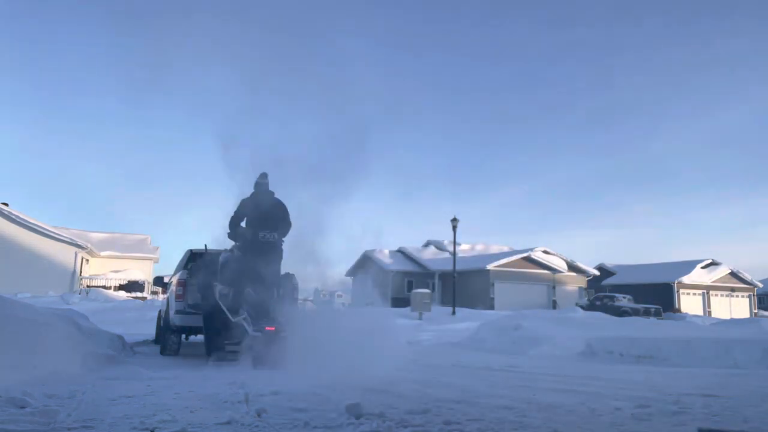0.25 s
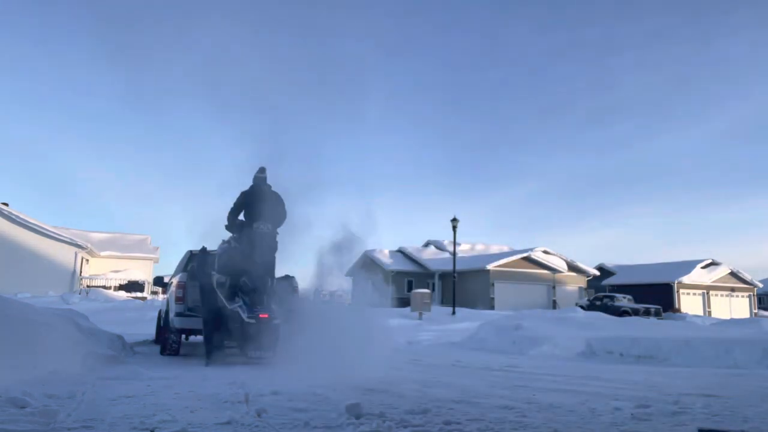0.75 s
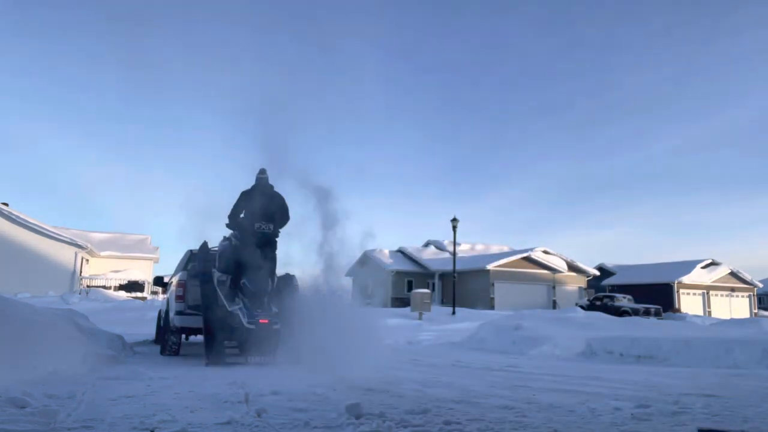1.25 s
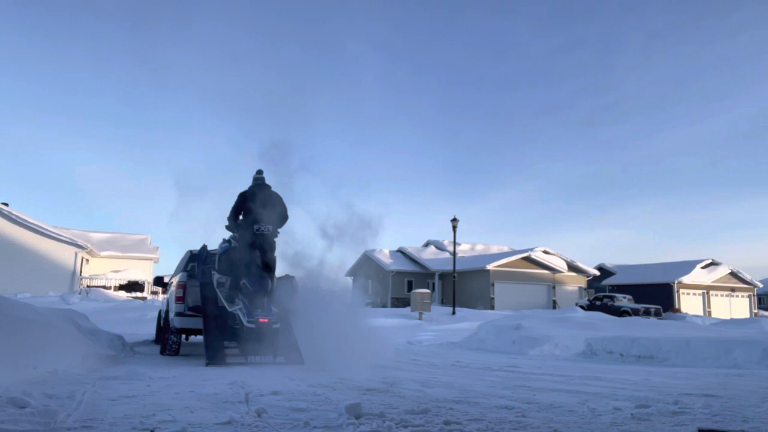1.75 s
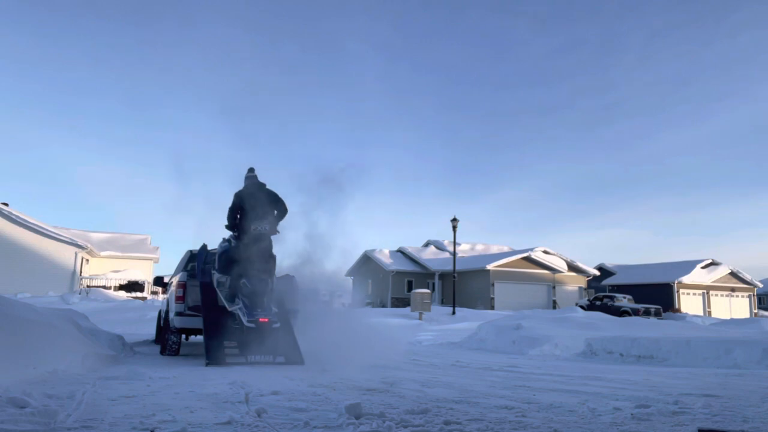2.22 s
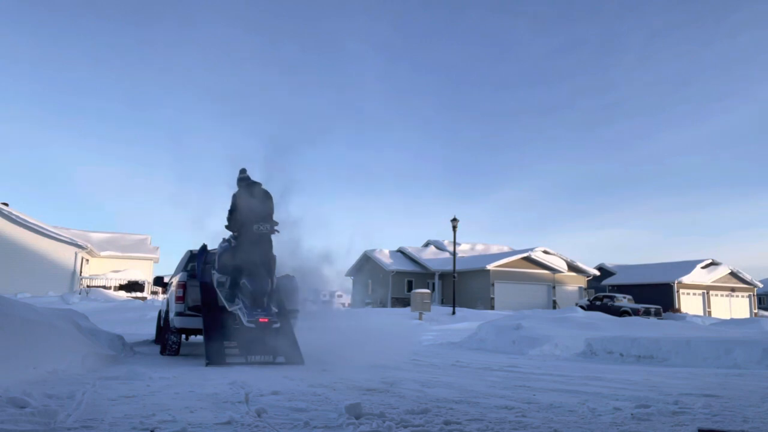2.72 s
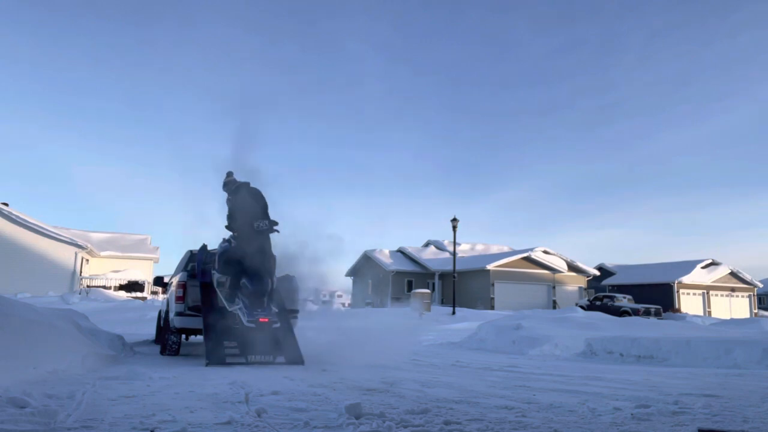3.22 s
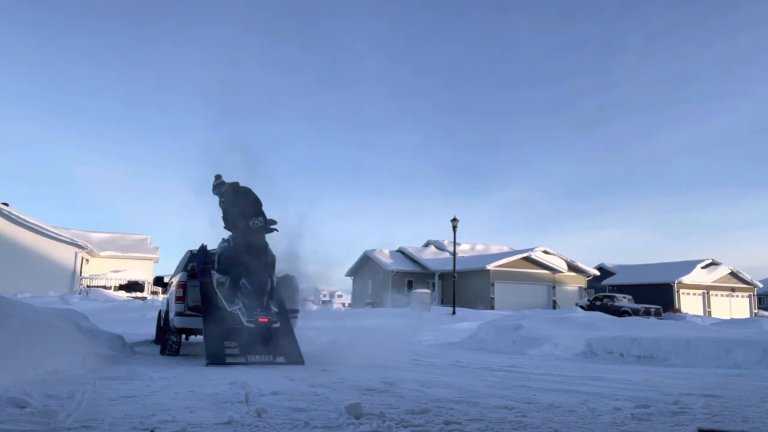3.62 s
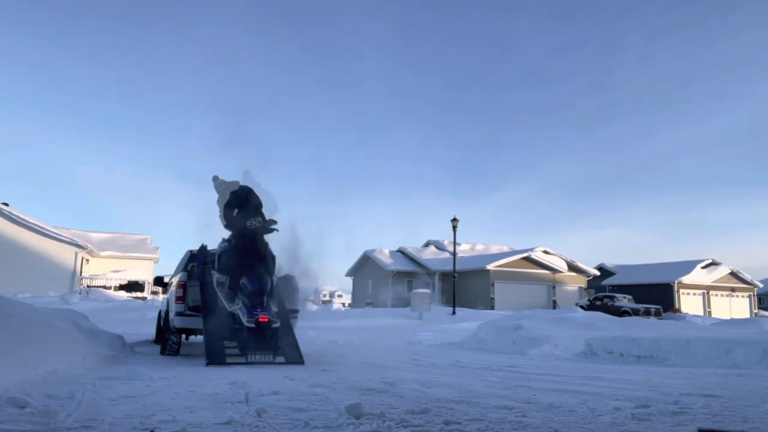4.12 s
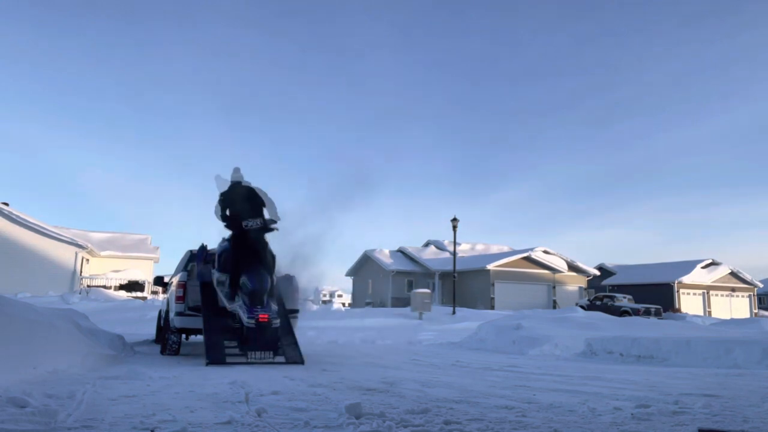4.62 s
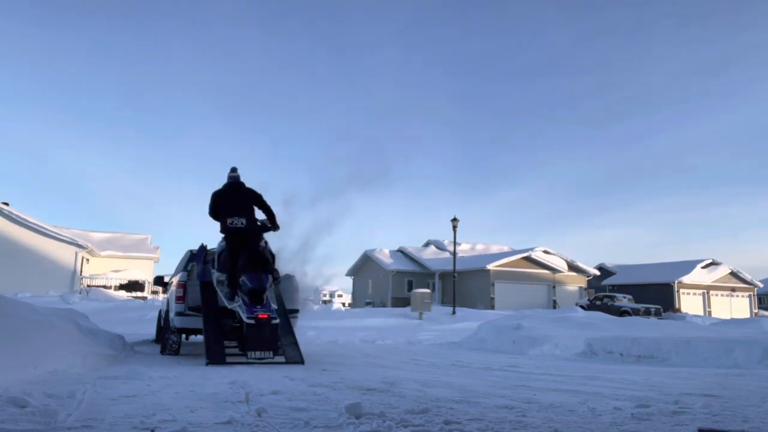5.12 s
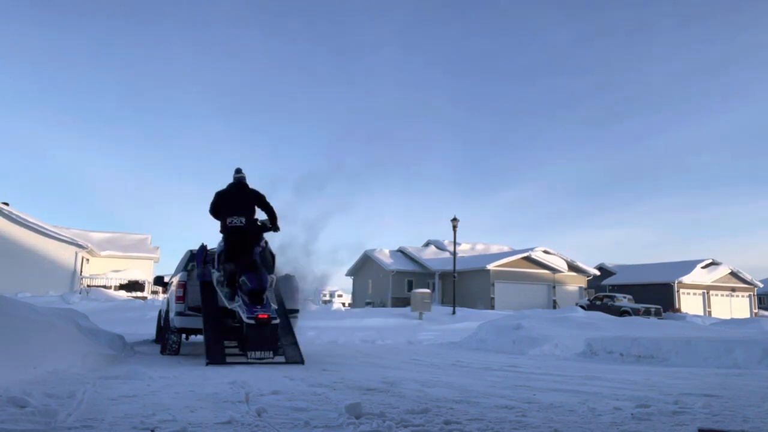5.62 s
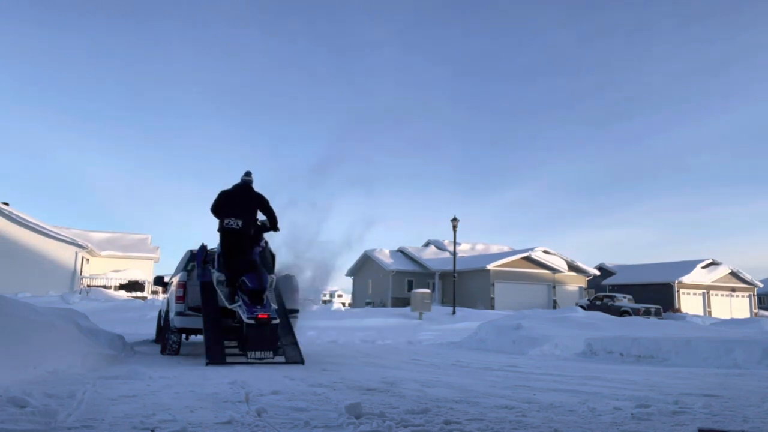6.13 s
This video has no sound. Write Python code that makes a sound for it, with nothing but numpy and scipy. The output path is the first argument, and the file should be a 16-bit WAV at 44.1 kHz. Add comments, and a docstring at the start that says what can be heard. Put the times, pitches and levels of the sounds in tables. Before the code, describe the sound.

Stereo phone capture of a snowmobile engine some metres away outdoors. It begins revved up in a buzzing drone, falls quickly to a slow chugging idle with hissing ticks and brief missed beats, then picks up to a fluttering, unsteady boom. Near the end it swells into a rough, full, rattling pull, with frequent metallic clacks and dull thuds over low chassis rumble.

```python
"""Two-stroke snowmobile, blip to idle to pull

A twin snowmobile on a ramp behind a pickup on a snowy street, heard some metres away. A throttle blip falls
to a lumpy idle, then the engine pulls with misfires. Its exhaust note sums crank orders through four pipe
bands. Coloured noise makes the rumble, the rush of air, the case rattle and the gas hiss, which ticks
strongly then weakly within each turn. Ringing noise bursts make the knocks of a metal part.
"""
import sys
import numpy as np
from scipy import signal
from scipy.fft import rfft, irfft, next_fast_len
from scipy.io import wavfile
from scipy.ndimage import uniform_filter1d

SR = 44100
rng = np.random.default_rng(int(sys.argv[2]) if len(sys.argv) > 2 else 0)


def store_pcm(level_fs):
    """Save levels as 16-bit WAV."""
    pcm = np.round(np.clip(level_fs, -1, 1) * 32767).astype(np.int16)
    wavfile.write(sys.argv[1], SR, np.atleast_2d(pcm).T)


N = 280476

# Noise colours, scaled to rms 1 before use: chassis rumble, rush of air, case rattle, steady gas hiss,
# ticking gas. Each row: frequency in Hz, relative density in dB per Hz.
RUMBLE_COLOUR = [(15, -41.5), (30, -24), (55, -4), (130, -7.5), (300, -12.5), (600, -44), (1200, -75)]
RUSH_COLOUR = [(300, -13), (700, 10), (1500, -6.5), (3500, -3.5), (6000, -5), (8500, -2.5), (11000, -10.5),
               (16000, -17.5)]
RATTLE_COLOUR = [(250, -14), (450, -3), (620, -1), (760, -5), (980, 0), (1280, -8), (1490, 3), (1750, -8),
                 (2080, 1), (2210, -5), (2340, -1), (2700, -10), (4000, -20)]
HISS_COLOUR = [(1500, -8), (3000, 22), (4500, 7.5), (4670, 17), (4850, -1), (6500, -5.5), (9000, -13),
               (12000, -16.5), (14000, -12), (16000, -15.5)]
TICK_COLOUR = [(1500, -17.5), (3000, 11), (4700, 0.5), (7000, 1), (9000, -6), (12000, 0), (14000, -12),
               (16000, -4.5)]
# Rush of air as the throttle shuts. Each row: time in seconds, level in dB.
RUSH_LEVEL = [(0.0, -43), (0.23, -43.5), (0.265, -32), (0.344, -26), (0.564, -50), (0.75, -68), (.95, -96)]

# Knocks of metal. Each row: start in seconds, crack level in dB, thud level in dB, both before the decay.
KNOCKS = [(0.047, -44, -60), (0.157, -44, -60), (0.7907, -65, -35.5), (1.012, -50, -54), (1.0407, -50, -47),
          (1.2351, -45, -55), (1.4627, -48, -50), (2.155, -42, -50), (2.308, -44, -65),
          (2.4401, -26.5, -44), (2.48, -35, -45), (2.698, -46.5, -61), (2.8886, -49, -67),
          (3.9449, -50, -46), (4.169, -49, -52.5), (4.4334, -48, -56.5), (4.8482, -42.5, -38),
          (5.034, -49, -48), (5.1178, -41, -47), (5.148, -44, -48), (5.2848, -40, -42), (5.3942, -36, -36),
          (5.449, -39.5, -43), (5.609, -43, -51.5), (5.6919, -41, -44.5), (5.962, -35.5, -41),
          (6.1567, -38.5, -43), (6.1844, -35.5, -36)]
# Ringing of the knocked part. Each row: frequency in Hz, width in Hz, relative level in dB.
KNOCK_MODES = [(4330, 990, 3), (7450, 2500, -3.5), (11000, 2400, -1), (2300, 1200, -1.5)]

# Speed of the crank. Each row: time in seconds, turns per second in Hz.
CRANK = [(0.0, 55.92), (0.28, 57.47), (0.43, 54.45), (0.49, 47.5), (0.6, 37.25), (0.8, 26.53),
         (0.99, 24.18), (1.26, 25.21), (1.38, 26.86), (1.7, 24.16), (2.0, 24.18), (2.1, 23.56),
         (2.21, 25.52), (2.48, 29.88), (2.81, 37.78), (2.92, 36.87), (3.2, 39.91), (3.35, 38.96),
         (3.65, 41.28), (3.9, 40.78), (4.16, 38.96), (4.29, 35.67), (4.68, 39.06), (5.14, 36.66),
         (5.37, 35.19), (5.48, 38.06), (5.66, 36.26), (6.0, 37.26), (6.12, 35.3), (6.24, 38.43),
         (6.36, 39.4)]
# How hard the engine works. Each row: time in seconds, effort in dB over the idle,
# odd crank orders in dB against the even ones.
EFFORT = [(0, 14, -21), (.23, 14, -21.5), (.35, 17.5, -19), (.55, 11, -11), (.92, -2.5, -1),
          (1.6, -2.5, -4.5), (2.3, 0, -8.5), (2.7, 1, -2.5), (3.3, 1, -2.5), (4.1, 1.5, -1), (4.6, 5.5, -3),
          (5.05, 11.5, -4), (5.2, 10.5, -8), (6.36, 11.5, 0.5)]
# Exhaust pipe bands, low to high. Each row: frequency in Hz, relative gain in dB.
THUMP_BAND = [(38, -40), (48, -6), (75, -4), (105, 1.5), (125, -5.5), (140, -34)]
BOOM_BAND = [(120, -30.5), (135, -3), (152, 6.5), (175, 4), (198, -8), (212, -37)]
DRONE_BAND = [(188, -25.5), (205, -1.5), (225, 3.5), (242, -5), (265, -18.5), (300, -13.5), (330, -22),
              (350, -31.5)]
SNARL_BAND = [(320, -33), (345, -8.5), (385, -1), (410, 8.5), (435, 0), (460, -8), (500, -8.5), (570, -8.5),
              (640, -15.5), (900, -25.5), (1030, -12), (1130, -28), (1250, -20.5)]
# Base levels of three pipe bands. Each row: time in seconds, thump in dB, boom in dB, drone in dB.
PIPE_LEVELS = [(0.0, -35.5, -35, -13.5), (0.22, -39, -31.5, -13), (0.41, -30.5, -52.5, -9),
               (0.45, -15.5, -26.5, -10.5), (0.49, -19.5, -16, -28.5), (0.55, -25.5, -17, -25.5),
               (0.61, -20, -45.5, -24.5), (0.72, -31, -27.5, -24), (0.83, -28.5, -20, -33.5),
               (0.95, -32, -24, -42), (1.19, -27.5, -20.5, -39), (1.45, -29, -23.5, -31),
               (1.85, -23.5, -20.5, -38), (2.4, -26, -20, -33.5), (2.8, -26, -14.5, -22),
               (3.1, -25.5, -14, -26), (3.55, -23, -13.5, -24), (3.75, -24, -20.5, -24),
               (4.02, -23.5, -16.5, -23.5), (4.16, -25, -14, -25), (4.4, -26.5, -17.5, -21.5),
               (4.6, -24.5, -12.5, -20.5), (5.05, -21.5, -10, -14), (5.15, -15.5, -12.5, -13),
               (5.5, -19.5, -9, -16), (5.67, -17, -11.5, -14), (6.36, -20, -9.5, -17)]
# Momentary sags of the boom. Each row: centre in seconds, change in dB, bell spread (sigma) in seconds.
BOOM_SAGS = [(2.621, -4, .03), (2.94, -5, 0.022), (3.232, -5.5, .05), (3.458, -21, 0.021),
             (3.588, -15.5, 0.033), (3.879, -8.5, 0.023), (4.001, -7.5, 0.055), (4.231, -11.5, 0.023),
             (4.45, -16, 0.015)]
# Stumble of the blip. The one row: centre in seconds, bell spread (sigma) in seconds.
STUMBLE = (.28, 0.022)
# Missed burns. Each row: centre in seconds, change in dB.
MISFIRES = [(0.921, -9), (1.263, -11), (1.758, -10), (1.88, -16.5), (2.047, -16), (2.456, -8),
            (4.221, -13.5), (5.144, -7), (5.172, -6), (5.256, -7), (5.284, -7.5), (5.369, -6.5),
            (5.418, -4), (5.689, -8), (5.722, -2), (5.826, -6), (6.094, -4.5), (6.186, -6.5)]

# Stereo lead. Each row: frequency in Hz, phase in radians by which left leads.
STEREO_PHASE = [(0, 0), (520, 0.5), (1380, 0.6), (2150, 1.9), (6890, 8.2), (7670, 6.6), (8870, 6.1),
                (9730, 3.3), (10600, 3.0), (11800, 0.1), (13000, -0.3), (13700, -3.2), (14600, -3.2),
                (15500, -6.5)]
# Stereo balance. Each row: frequency in Hz, left minus right in dB.
STEREO_BALANCE = [(60, 3), (110, -5.5), (200, -3.5), (380, -2.5), (700, 0.5), (1290, 0), (2380, -2),
                  (4400, -1), (8120, 0), (15000, -0.5)]
# Scattered sound. Each row: frequency in Hz, gain in dB.
SCATTER_GAIN = [(60, -30), (150, -27.5), (400, -8.5), (1000, 0.5), (3000, -10), (5500, -0.5), (8000, -9.5),
                (16000, -26.5)]

IDLE_HZ = 25  # reference crank speed
RUMBLE_DB = -19  # against the running level of the exhaust note
RATTLE_DB = -54.5  # at zero effort, before its throb and wander
HISS_DB, HISS_DB_PER_EFFORT_DB = -56.5, 0.74  # steady and ticking gas together, at zero effort
IDLE_TICK, TICK_POWER = 0.75, 2.4  # ticking share of gas power at IDLE_HZ, and how fast speed reduces it
SNARL_DB, SNARL_DB_PER_EFFORT_DB, SNARL_DB_PER_OCTAVE = -54.5, 0.75, 13  # at zero effort and IDLE_HZ
STUMBLE_DRONE_DB, STUMBLE_SNARL_DB = -10.5, 4.5
IDLE_ROUGH, ROUGH_HALVES_DB = 0.24, 7  # uneven burn at IDLE_HZ, halved by each 7 dB of effort
COAST_HZ_PER_S = 400  # a fall of crank speed that adds 1 to the roughness
STROKE_SCATTER_DB = 2  # stroke-to-stroke spread, times the root of the roughness


def undb(db):
    """Turn decibels into gain."""
    return 10 ** (np.asarray(db) / 20)


def unit(x):
    """Scale to rms 1."""
    return x / np.sqrt(np.mean(x ** 2))


def steady(x, span_s):
    """Level a sound by its running rms, bringing it to about 1."""
    size = int(span_s * SR)
    power = uniform_filter1d(uniform_filter1d(x ** 2, size), size)
    return x / np.sqrt(power + 1e-18)


def curves(table):
    """Draw the columns of a timed table as sample-by-sample automation."""
    s, *columns = np.transpose(table)
    return [np.interp(np.arange(N) / SR, s, column) for column in columns]


def bell(centre_s, spread_s):
    """Shape a smooth Gaussian bump of height 1."""
    return np.exp(-0.5 * ((np.arange(N) / SR - centre_s) / spread_s) ** 2)


def wander(rate):
    """Drift between complex random values, rate times a second, rms about 1."""
    knots = rng.standard_normal((2, int(N / SR * rate) + 2))
    place = np.arange(N) / SR * rate
    real, imag = [np.interp(place, np.arange(knots.shape[1]), row) for row in knots]
    return (real + 1j * imag) * np.sqrt(3 / 4)  # brings the mean power to 1


def on_log(table, size=N):
    """Read a frequency table at every spectrum bin, along a log axis."""
    hz, value = np.transpose(table)
    return np.interp(np.log(np.fft.rfftfreq(size, 1 / SR) + 1), np.log(hz + 1), value)


def noise_pair(colour):
    """Colour two independent noises in the spectrum, each rms 1: for direct and scattered sound."""
    gain = undb(on_log(colour))
    return np.array([unit(irfft(rfft(rng.standard_normal(N)) * gain, N)) for _ in range(2)])


def ring(x, modes):
    """Excite resonances side by side, alternating in sign."""
    out = 0
    for k, (hz, width_hz, db) in enumerate(modes):
        b, a = signal.iirpeak(hz, hz / width_hz, fs=SR)
        out = out + (-1) ** k * undb(db) * signal.lfilter(b, a, x)
    return out


def chassis_rumble(note):
    """Low noise of the chassis that swells with the exhaust note's power."""
    note_level = np.sqrt(uniform_filter1d(note ** 2, int(0.15 * SR)))
    return undb(RUMBLE_DB) * note_level * noise_pair(RUMBLE_COLOUR)


def air_rush():
    """Turbulent air as the throttle shuts: a swell of broad noise."""
    return undb(curves(RUSH_LEVEL)[0]) * noise_pair(RUSH_COLOUR)


def knocks(crack_s=0.0039, tail_s=0.054, tail_db=-13, thud_s=0.033, rise_s=0.00092, swell_s=0.01):
    """Metal on metal: a bright ringing crack with a short tail over a dull thud."""
    t = np.arange(int(0.2 * SR)) / SR
    crack_shape = np.exp(-t / crack_s) + undb(tail_db) * np.exp(-t / tail_s)
    crack_shape = crack_shape * (1 - np.exp(-t / rise_s))
    thud_shape = np.exp(-t / thud_s) * (1 - np.exp(-t / swell_s))
    thud_mode = [(600, 600, 0)]  # Hz, width in Hz, dB
    out = np.zeros(N + len(t))
    for s, crack_db, thud_db in KNOCKS:
        burst = rng.standard_normal((2, len(t)))
        crack = unit(ring(burst[0], KNOCK_MODES)) * crack_shape
        thud = unit(ring(ring(burst[1], thud_mode), thud_mode)) * thud_shape
        start = int(s * SR)
        out[start:start + len(t)] += undb(crack_db) * crack + undb(thud_db) * thud
    return out[:N]


def gas_puffs(turns, hz, lag=0.064, decay_s=0.011, second_db=-9):
    """Envelope of a decaying gas puff at each half turn, every second one weaker; lag in turns."""
    half_turns = 2 * (turns + lag)
    k = half_turns.astype(int)
    scatter_db = 1.5 * rng.standard_normal(k[-1] + 1)[k]
    age_s = (half_turns - k) / (2 * hz)
    puff = undb(second_db * (k % 2) + scatter_db) * np.exp(-age_s / decay_s)
    return steady(uniform_filter1d(puff, int(0.0024 * SR)), 0.16)


def gas_hiss(effort_db, tick_share, puff):
    """Escaping gas: power shared between steady hiss and noise pulsed by the puffs."""
    gas = undb(HISS_DB + HISS_DB_PER_EFFORT_DB * effort_db)
    hiss = gas * np.sqrt(1 - tick_share) * noise_pair(HISS_COLOUR)
    tick = gas * np.sqrt(tick_share) * puff * noise_pair(TICK_COLOUR)
    return hiss + tick


def case_rattle(effort_db, tick_share, puff):
    """Rattling case: noise that follows the effort, throbs with the puffs and wanders in level."""
    # the case rings longer, so its rattle throbs less
    throb = 1 + 0.51 * tick_share * uniform_filter1d(puff, int(0.004 * SR))
    level = undb(RATTLE_DB + effort_db) * throb * undb(2.0 * wander(30).real)
    return level * noise_pair(RATTLE_COLOUR)


def roughness(hz, effort_db):
    """Unevenness of the burn: eased by effort and crank speed, raised as the engine slows."""
    rough = IDLE_ROUGH * 0.5 ** (effort_db / ROUGH_HALVES_DB) * IDLE_HZ / hz
    slowing = uniform_filter1d(-np.gradient(hz) * SR, SR // 20)
    return rough + np.clip(slowing / COAST_HZ_PER_S, 0, 1)


def pipe_levels(hz, effort_db):
    """Levels of the four pipe bands in dB, with the sags of the boom and the stumble of the blip."""
    thump_db, boom_db, drone_db = curves(PIPE_LEVELS)
    boom_db = boom_db + sum(db * bell(s, spread_s) for s, db, spread_s in BOOM_SAGS)
    snarl_db = SNARL_DB + SNARL_DB_PER_EFFORT_DB * effort_db
    snarl_db = snarl_db + SNARL_DB_PER_OCTAVE * np.log2(hz / IDLE_HZ)
    stumble = bell(*STUMBLE)
    return thump_db, boom_db, drone_db + STUMBLE_DRONE_DB * stumble, snarl_db + STUMBLE_SNARL_DB * stumble


def misfires(spread_s=0.0043):
    """A missed burn leaves a short hole in the exhaust note."""
    return undb(sum(db * bell(s, spread_s) for s, db in MISFIRES))


def stroke_strength(turns, rough):
    """Random strength for each half turn, scattered more when the burn is rough."""
    stroke = (2 * turns).astype(int)
    strength_db = STROKE_SCATTER_DB * np.sqrt(rough) * rng.standard_normal(stroke[-1] + 1)[stroke]
    return undb(uniform_filter1d(strength_db, SR // 150))


def exhaust(hz, turns, odd_db, rough, pipes_db, drift_rate=13, blur_hz=260, count=24):
    """Crank orders through four pipe bands; uneven burns blur them, the high ones most."""
    pipes = np.zeros((4, N))
    # one cylinder fires a little late, so the odd orders lag the even ones
    even, odd = 1, np.exp(-1.4j) * undb(odd_db)
    for k in range(1, count + 1):
        blur = np.clip(rough * (1 + (k * hz / blur_hz) ** 2), 0, 0.85)
        regular = np.sqrt(1 - blur) * (odd if k % 2 else even)
        uneven = np.sqrt(blur) * wander(drift_rate * (1 + k / 8))
        wave = np.real((regular + uneven) * np.exp(2j * np.pi * k * turns))
        for j, band in enumerate([THUMP_BAND, BOOM_BAND, DRONE_BAND, SNARL_BAND]):
            band_hz, band_db = np.transpose(band)
            gain_db = np.interp(np.log(k * hz), np.log(band_hz), band_db, left=-90, right=-90)
            pipes[j] += wave * undb(gain_db)
    return sum(undb(db) * steady(pipe, 0.093) for pipe, db in zip(pipes, pipes_db))


def engine():
    """One crank drives exhaust, rattle and gas; two rows: direct and scattered sound."""
    (hz,), (effort_db, odd_db) = curves(CRANK), curves(EFFORT)
    turns = np.cumsum(hz) / SR
    rough = roughness(hz, effort_db)
    note = exhaust(hz, turns, odd_db, rough, pipe_levels(hz, effort_db))
    note = note * misfires() * stroke_strength(turns, rough)
    tick_share = np.clip(IDLE_TICK * (IDLE_HZ / hz) ** TICK_POWER, 0, 1)
    puff = gas_puffs(turns, hz)
    # the scattered exhaust note arrives 21 ms late
    notes = np.array([note, np.roll(note, int(0.021 * SR))])
    background = chassis_rumble(note) + air_rush()
    return background + case_rattle(effort_db, tick_share, puff) + gas_hiss(effort_db, tick_share, puff) + notes


def scene():
    """The phone's stereo processing shifts left against right by frequency; scattered sound widens the image."""
    size = next_fast_len(N + SR // 10)
    direct, scattered = rfft(np.array([knocks(), knocks()]) + engine(), size)
    hz, lead = np.transpose(STEREO_PHASE)
    # half of the phase lead and balance goes to each side
    turn = np.exp(0.5j * np.interp(np.fft.rfftfreq(size, 1 / SR), hz, lead))
    side = turn * undb(on_log(STEREO_BALANCE, size=size) / 2)
    scattered = scattered * undb(on_log(SCATTER_GAIN, size=size))
    # opposite signs spread the scattered sound across the stereo image
    left, right = (direct + scattered) * side, (direct - scattered) / side
    return irfft([left, right], size)[:, :N]


def record(dry):
    """The phone drops the deepest bass, rounds the loudest peaks and cuts the top."""
    bass_cut = signal.butter(2, 35, "high", fs=SR, output="sos")
    top_cut = signal.ellip(10, 0.2, 80, 15800, fs=SR, output="sos")  # 0.2 dB ripple, 80 dB stop, edge in Hz
    thinned = signal.sosfilt(bass_cut, dry)
    rounded = np.tanh(0.57 * thinned) / 0.61
    return signal.sosfilt(top_cut, rounded)


dry = scene()
out = record(dry)
store_pcm(out)
```